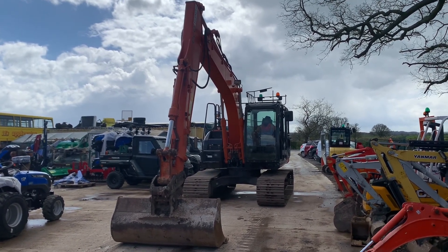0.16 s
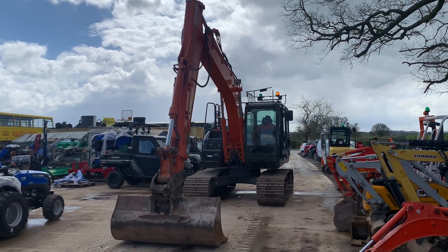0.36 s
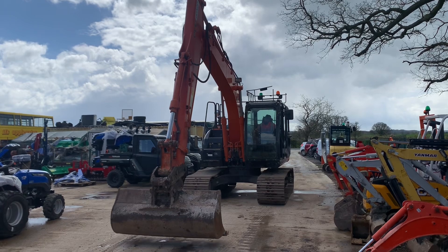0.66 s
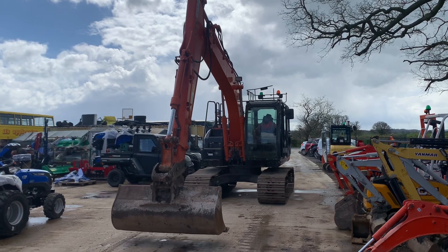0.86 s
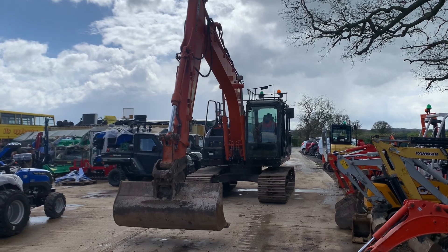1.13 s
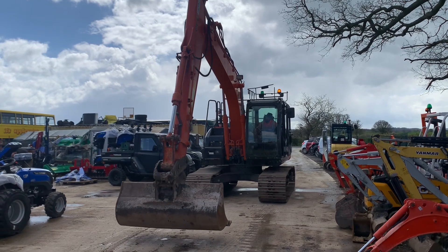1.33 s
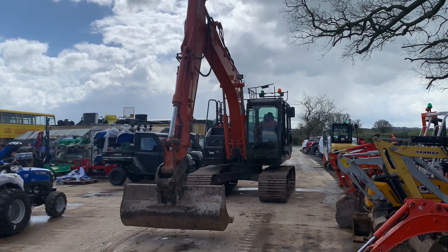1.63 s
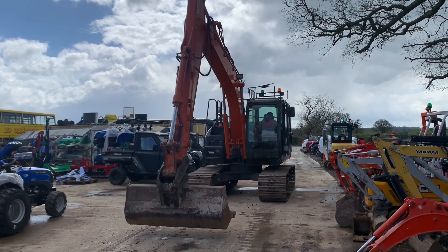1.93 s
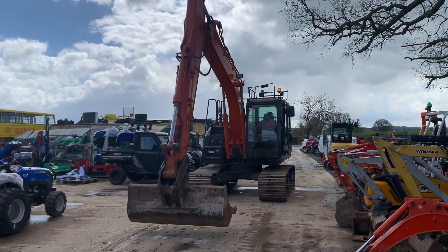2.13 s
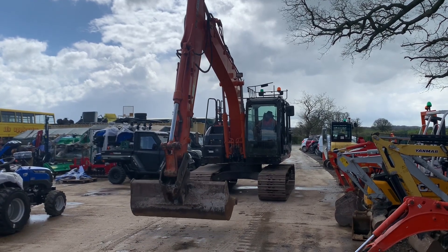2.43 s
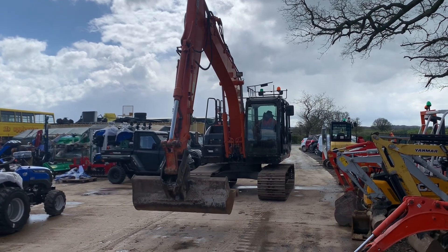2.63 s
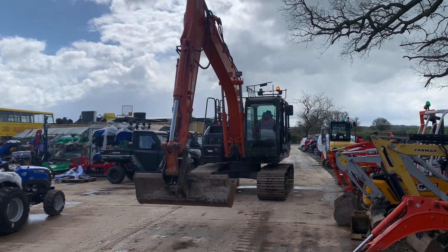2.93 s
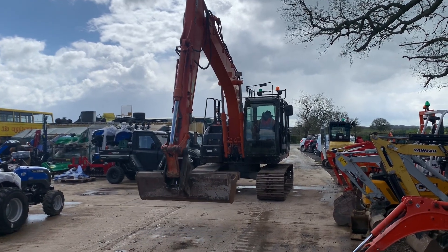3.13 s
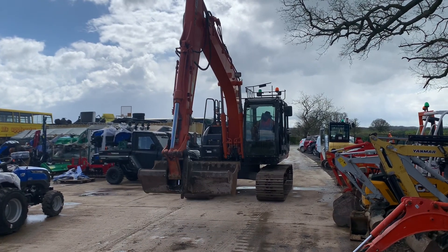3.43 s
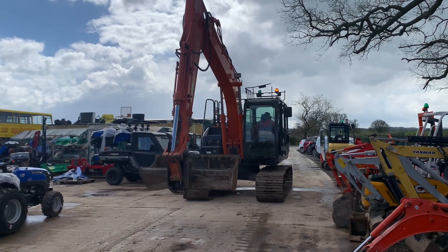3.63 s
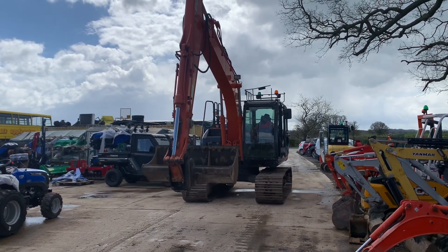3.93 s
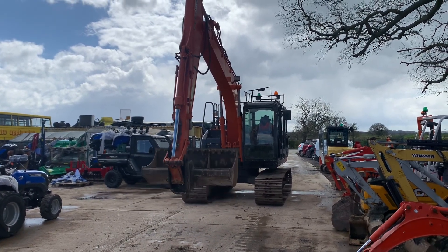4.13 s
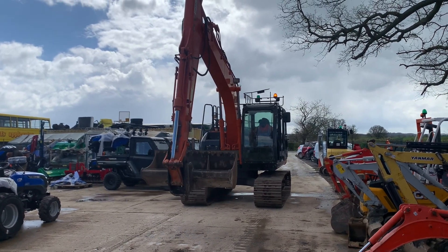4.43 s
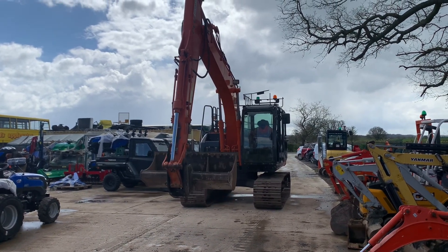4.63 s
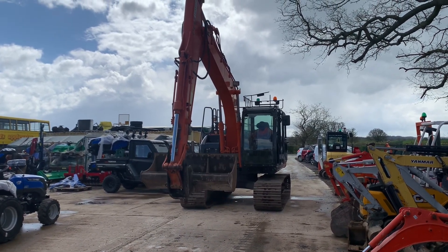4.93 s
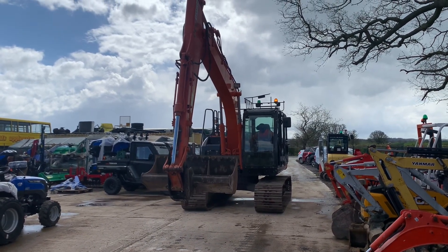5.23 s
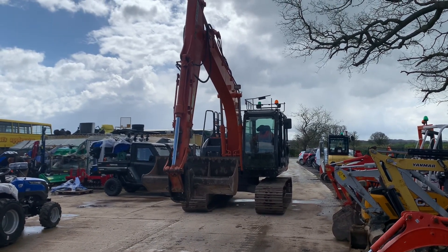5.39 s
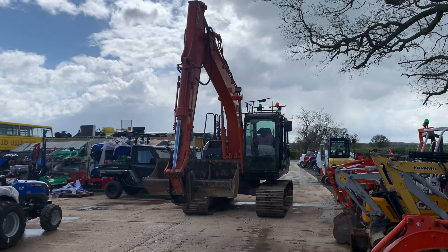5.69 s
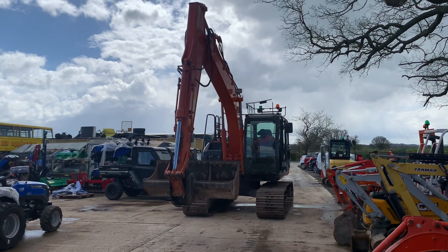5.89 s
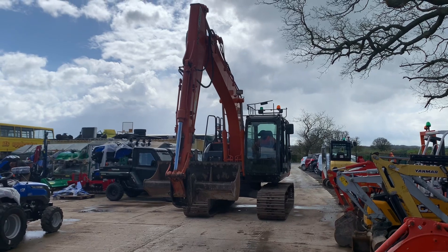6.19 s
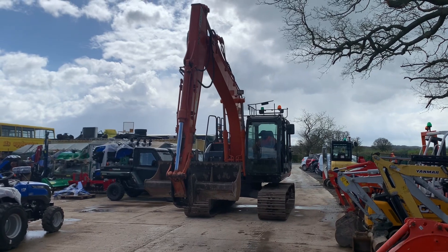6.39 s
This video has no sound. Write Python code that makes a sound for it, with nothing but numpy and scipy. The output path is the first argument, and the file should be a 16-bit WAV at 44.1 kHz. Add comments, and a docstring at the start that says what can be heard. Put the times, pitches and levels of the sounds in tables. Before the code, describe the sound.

Tracked excavator engine droning steadily in an open yard, with hydraulic whine, thin pin squeaks, heavy steel knocks, and wind buffeting the microphone.

```python
"""A gust bursts against the microphone over the hum of a tracked excavator idling in an open yard.
Engine: harmonics of the firing rate and coloured noise that pulses with it. Pump: narrow-band whistles.
Moving arm and bucket: valve hiss from noise, pin squeaks from gliding resonances, clunks from decaying
noise and ringing modes. Wind: low rumble, faster flutter and damped thumps of single eddies."""
import sys
import numpy as np
from scipy import signal
from scipy.fft import rfft, irfft, next_fast_len
from scipy.io import wavfile
from scipy.ndimage import uniform_filter1d

SR = 44100
rng = np.random.default_rng(int(sys.argv[2]) if len(sys.argv) > 2 else 0)


def log_audio(samples):
    """Write samples as a 16-bit WAV file to the path given in sys.argv[1]."""
    # one column per channel
    frames = np.atleast_2d(samples).T
    # limit to full scale, then quantise
    limited = np.clip(frames, -1, 1)
    pcm = np.round(limited * 32767).astype(np.int16)
    wavfile.write(sys.argv[1], SR, pcm)


N = 288855  # length in samples

# engine firing rate, which steps up once: t/s, f/Hz
FIRING_RATE = [(0, 46.72), (2.55, 46.63), (2.75, 47.58), (4.5, 47.47), (6.55, 47.67)]
# hydraulics at work: t/s, pump whine level/dB, oil hiss level/dB, throbbing valve tone level/dB
HYDRAULIC_WORK = [(0, -58.5, -65, -54), (.5, -54, -64.5, -56.5), (1.1, -48.5, -64.5, -47.5),
                  (1.6, -51, -64.5, -54.5), (2.15, -50, -64.5, -55.5), (2.6, -48.5, -63.5, -51.5),
                  (3.1, -52.5, -65.5, -61.5), (3.3, -53.5, -65.5, -54), (3.75, -52.5, -67.5, -54.5),
                  (3.95, -54, -65.5, -55.5), (4.6, -53, -63.5, -57), (4.9, -55, -69, -66),
                  (5.75, -57, -71, -60.5), (5.9, -54, -70, -51), (6.06, -56, -69, -48.5),
                  (6.15, -53, -70, -58), (6.55, -53.5, -66.5, -57)]


def engine_hum():
    """Periodic firing radiates a harmonic series: a nearly pure fundamental with weak overtones."""
    # level of the hum: t/s, level/dB
    hum_level = [(0, -26), (.6, -33), (1.1, -29), (1.9, -27.5), (2.3, -31), (3.2, -26), (3.7, -30),
                 (4.2, -29), (4.4, -25), (4.65, -31), (5.05, -24), (5.3, -31), (5.7, -28.5), (6.1, -31),
                 (6.55, -30.5)]
    # overtones: multiple of the firing rate, level relative to the fundamental/dB
    overtones = [(2, -10.5), (3, -16.5)]
    (level_db,) = curves(hum_level)
    phase = 2 * np.pi * firing_cycles()
    hum = np.sin(phase)
    for multiple, overtone_db in overtones:
        hum = hum + amp(overtone_db) * np.cos(multiple * phase)
    return np.sqrt(2) * amp(level_db + 1.2 * wander(5, N)) * hum


def engine_clatter():
    """Amplitude modulation of noise: each firing starts a pulse that decays within its cycle."""
    # spectrum of engine and fan: f/Hz, relative density/dB per Hz
    clatter_colour = [(60, -37.5), (100, -1.5), (172, 0.5), (348, -18.5), (480, -20.5), (634, -21.5),
                      (760, -14.5), (969, -21), (1190, -20.5), (1740, -25.5), (2110, -28.5), (2350, -31.5),
                      (2600, -36.5), (2950, -36.5), (3300, -36.5), (4500, -55.5), (8000, -81)]
    mean_db, follows = -37, 0.48  # follows: share of the hiss's dB swing
    hiss_db = curves(HYDRAULIC_WORK)[1]
    pulse = 1 + 0.38 * np.exp(-(firing_cycles() % 1) / 0.14)
    throb = pulse * amp(1.4 * wander(77, N) + 0.5 * wander(4.7, N))
    clatter = evened(coloured(rng.standard_normal((2, N)) * throb, clatter_colour))
    return drifting(clatter, 1.7) * amp(mean_db + follows * (hiss_db - hiss_db.mean()))


def pump():
    """Narrow-band resonance: fuzzy whistles that swell by chance, and a valve tone on the engine's cycle."""
    # whine of pump and pipes: f/Hz, bandwidth/Hz, relative level/dB, level change at rest/dB
    pipe_whistles = [(472, 26, -5, 2), (515, 30, -9, 0), (622, 42, 0, -1), (678, 20, -15, 0),
                     (735, 50, -13, 3), (1278, 20, -6.5, -4), (1365, 40, -15, 4), (1510, 35, -12, 0),
                     (1590, 25, -15, 0), (1470, 100, -5, 0), (1695, 26, -10, -1), (1768, 36, -8.5, -9),
                     (1915, 35, -15, 0), (1965, 40, -16, -3), (2080, 70, -11, -2)]
    rest_span_s = (3.9, 5.5)  # the arm comes to rest over this span
    valve_hz, valve_width_hz, firings_per_throb = 848, 42, 4
    whine_db, _, valve_db = curves(HYDRAULIC_WORK)
    rest = np.interp(np.arange(N) / SR, rest_span_s, (0, 1))
    load_drift = wander(1.2, N)  # load pulls the pitch of all whistles together

    whine = np.zeros((2, N))
    for hz, width, level_db, rest_db in pipe_whistles:
        swell = amp(level_db + rest_db * rest + 2.0 * wander(2.6, N) + 2.0 * wander(13, N))
        pitch = hz * (1 + .002 * load_drift) + .25 * width * wander(3, N)
        whine += swell * whistle(N, pitch, width, .5)

    beat = np.cos(2 * np.pi * firing_cycles() / firings_per_throb)
    valve_gain = amp(valve_db + 8 * (beat - .2) + 1.5 * wander(8, N))
    valve = valve_gain * whistle(N, valve_hz + 22 * wander(8, N), valve_width_hz, 1.6)
    return whine * amp(whine_db + 1.5 * beat) + valve


def hiss():
    """Turbulent flow noise: oil forced through the valves gives broadband noise that flickers."""
    # spectrum of the oil hiss: f/Hz, relative density/dB per Hz
    hiss_colour = [(2000, -10), (3200, 7.5), (4000, 2.5), (5000, -2), (6000, -4), (7500, -9.5), (9500, -14),
                   (10600, -20), (11000, -11), (11500, -39), (14000, -37)]
    flicker = amp(0.75 * wander(40, N) + 0.74 * wander(6.3, N))
    noise = evened(coloured(rng.standard_normal((2, N)) * flicker, hiss_colour))
    return noise * amp(curves(HYDRAULIC_WORK)[1])


def squeaks():
    """Stick-slip friction in a loaded pin excites one wavering resonance; narrow ones sing more steadily."""
    # squeaks and groans: start t/s, end t/s, start f/Hz, end f/Hz, bandwidth/Hz, level/dB
    pin_squeaks = [(0.891, 1.221, 5800, 5940, 300, -73.5), (1.1, 1.7, 4170, 4190, 80, -72),
                   (1.283, 1.58, 3500, 3520, 110, -68), (1.28, 1.62, 3815, 3770, 60, -67),
                   (1.46, 2.2, 4085, 3910, 60, -63.5), (1.6, 1.83, 5060, 5000, 110, -74),
                   (1.75, 2.5, 3790, 3820, 60, -73), (1.7, 2.65, 4180, 4180, 70, -73.5),
                   (1.88, 2.4, 3490, 3460, 60, -63.5), (1.95, 2.8, 3450, 3350, 200, -66),
                   (2.3, 2.5, 3900, 4000, 200, -70), (2.03, 2.47, 7660, 7640, 60, -78),
                   (2.76, 2.95, 4050, 4200, 260, -66), (2.75, 3.2, 7700, 7700, 90, -81),
                   (2.85, 3.1, 3780, 3600, 200, -65), (2.9, 3.2, 4200, 4150, 120, -71),
                   (2.85, 3.15, 3250, 3200, 150, -69), (2.75, 3.22, 3450, 3600, 150, -65.5),
                   (3.1, 3.9, 3450, 3300, 180, -69.5), (3.56, 3.65, 3625, 3635, 32, -55.5),
                   (3.935, 3.978, 3620, 3610, 22, -59.5), (3.985, 4.05, 3600, 3610, 30, -62),
                   (4.19, 4.287, 4153, 4200, 120, -65.5), (3.97, 4.11, 1430, 1520, 160, -50),
                   (4.0, 4.08, 1200, 1280, 130, -48.5), (4.01, 4.09, 1750, 1850, 250, -54),
                   (4.19, 4.3, 1780, 1650, 220, -51), (4.18, 4.27, 1350, 1400, 160, -51)]
    out = np.zeros((2, N))
    for start_s, end_s, start_hz, end_hz, width, level_db in pin_squeaks:
        n = round((end_s - start_s) * SR)
        taper = signal.windows.tukey(n, .3 + min(end_s - start_s, .5))
        spurts = amp(level_db + 2.2 * wander(22, n)) * taper
        glide = start_hz + (end_hz - start_hz) * np.linspace(0, 1, n) ** 3  # moves mostly near its end
        pitch = glide + .25 * width * wander(12, n)
        add(out, start_s, whistle(n, pitch, width, 40 / width) * spurts)
    return out


def clunks():
    """Impact on heavy steel excites many modes at once: a dense noise burst, and a few modes that ring."""
    # bucket linkage knocks: start t/s, initial burst level/dB, t60/s, brightness/dB per octave
    knocks = [(0.934, -43.5, 0.056, -3), (3.222, -43, .08, -6), (3.256, -43, 0.06, -9),
              (3.312, -46.5, 0.038, -8), (3.752, -31, .03, 0), (3.872, -32.5, 0.044, -9.5),
              (3.883, -31, 0.19, -1), (3.899, -32, 0.14, -6), (3.925, -37, 0.07, 2),
              (4.004, -38.5, 0.56, -12), (4.1, -44, .1, -11.5), (4.155, -32, 0.26, -2),
              (4.176, -41.5, 0.16, -4.5), (4.195, -40.5, .1, -10), (4.305, -47, 0.065, -5),
              (4.46, -41.5, 0.89, -1.5), (4.618, -46, 0.095, 5), (5.071, -55, 0.19, 7),
              (5.415, -45, 0.12, 4), (5.889, -46.5, 0.13, -6.5), (6.033, -44, 0.17, -9)]
    # spectrum of a knock: f/Hz, relative density/dB per Hz
    steel_colour = [(240, -21.5), (400, -9.5), (591, 4), (724, -13), (857, 1.5), (1380, -1), (2090, -2.5),
                    (2480, -10), (3320, -14.5), (3900, -15), (5000, -32.5), (8000, -41.5), (12000, -50.5)]
    # ringing modes: f/Hz, relative level/dB, longest t60/s
    steel_modes = [(607, -11, 0.067), (1270, -10, 0.13), (1332, -13, 0.19), (2040, -18, 0.13),
                   (2800, -19, 0.055), (4200, -16.5, 0.021)]
    out, t = np.zeros((2, N)), np.arange(SR // 2) / SR
    for start_s, level_db, t60, tilt_db in knocks:
        burst = rng.standard_normal((2, len(t))) * amp(1.5 * wander(150, len(t)))  # loose parts rattle
        tilt = [(500, -2 * tilt_db), (8000, 2 * tilt_db)]
        burst = evened(coloured(coloured(burst, steel_colour), tilt))
        burst = burst * amp(-60 * t / max(t60, .01))
        for hz, mode_db, mode_t60 in steel_modes:
            detune, chance = rng.standard_normal(2)
            start_db = mode_db + 4 + 1.5 * chance + tilt_db * np.log2(hz / 2000)
            ring_gain = amp(start_db - 60 * t / min(mode_t60, t60))
            burst = burst + ring_gain * np.sin(2 * np.pi * hz * (1 + 0.011 * detune) * t)
        onset = 1 - np.exp(-t / 0.0025)
        add(out, start_s, burst * amp(level_db) * onset)
    return out


def eddies():
    """Pressure pulses of single eddies: damped oscillations, the hardest starting with a snap of noise."""
    # thumps on the microphone: start t/s, peak level/dB, f/Hz, decay length/cycles
    eddy_thumps = [(.074, -13, 294, 1.1), (0.091, -21.5, 258, 1.4), (.103, -1, 343, 3.4),
                   (.105, -11, 560, 2), (0.116, -5, 92, 1.8), (.132, -9.5, 426, 4.6), (0.193, -8, 381, 3.7),
                   (0.195, -8, 131.6, 2.2), (.197, -8, 510, 1.9), (0.221, -7, 432, 1.2),
                   (.236, -17, 584, 2), (.249, -13, 350, 0.63), (0.26, -24.5, 520, 2),
                   (.288, -12, 298, 1.4), (0.313, -15.5, 235, 1.2), (.371, -14, 350, 1.6),
                   (0.396, -13, 298, 0.46), (.42, -29.5, 550, 1.8), (0.429, -12.5, 281, 0.73),
                   (0.461, -18, 332, 1), (.573, -20, 266, 2.1), (0.66, -13.5, 199, 3.1),
                   (0.68, -10, 77, 2.5), (0.962, -25, 108, 2.9), (0.984, -21, 350, 0.83),
                   (1.017, -25, 109, 3), (1.17, -21, 208, 1.56), (1.274, -13.5, 173, 0.94),
                   (1.408, -11.5, 148, 0.41), (1.697, -18.5, 98, 1.1), (1.85, -13.5, 102, 0.93),
                   (2.227, -12.5, 126, 0.56), (2.276, -16.5, 204, 0.94), (2.351, -25, 470, 0.65),
                   (2.387, -22, 87, 1.2), (2.433, -19, 98, 3.2), (3.082, -19.5, 112, 1.5),
                   (3.258, -24, 413, 1.1), (3.339, -13, 75.1, 12), (3.383, -30, 219, 2),
                   (3.411, -16, 105, 3.6), (3.872, -21, 295, 1.8), (4.011, -23, 248, 7.7),
                   (4.139, -18.5, 237, 1.8), (4.25, -17.5, 259, 2.4), (4.274, -18, 322, 5.2),
                   (4.342, -14.5, 121, 0.41), (4.443, -12.5, 152, 0.94), (4.459, -13.5, 238, 1.8),
                   (4.528, -21, 212, 5.8), (4.946, -18, 202, 1.3), (4.993, -13, 83, 2.4),
                   (5.024, -12, 75, 2.1), (5.123, -21, 202, 0.99), (5.605, -16.5, 190, 2.7),
                   (5.615, -27, 476, 2.5), (5.651, -15, 252, 2.3), (5.67, -11.5, 61.7, 0.92),
                   (5.814, -13, 75, 3.3), (5.82, -26.5, 350, 1.1), (5.953, -22.5, 248, 1.4),
                   (6.326, -18.5, 112, 1.5)]
    # spectrum of the snap: f/Hz, relative level/dB
    snap_colour = [(600, -11.5), (1200, -4), (2200, 6), (3000, -6), (4000, -16)]
    snap_s, snap_db, snap_grows = .003, -24, 2.5  # peak time, gain for a 0 dB thump, dB per dB
    thumps, snap_gain, t = np.zeros(N), np.zeros(N), np.arange(SR // 40) / SR
    for start_s, peak_db, hz, cycles in eddy_thumps:
        u = np.arange(round(3 * cycles / hz * SR)) * hz / SR  # time in cycles
        onset = 1 - np.exp(-(u / 0.39) ** 2)
        thump = np.sin(2 * np.pi * u) * np.exp(-2.5 * u / cycles) * onset
        add(thumps, start_s, amp(peak_db) * thump / abs(thump).max())
        snap = t / snap_s * np.exp(1 - t / snap_s)
        add(snap_gain, start_s, amp(snap_db + snap_grows * peak_db) * snap)
    return thumps + snap_gain * evened(coloured(rng.standard_normal(N), snap_colour))


def wind():
    """Turbulent pressure on the microphone: lumpy low rumble, flutter in strong gusts, and eddy thumps."""
    # gusts: t/s, rumble level/dB, flutter level/dB
    gusts = [(0, -36, -33), (.07, -29.5, -29), (.097, -24, -28), (.107, -15, -15), (.12, -14, -27),
             (.137, -17, -20), (.16, -25, -32), (.185, -23, -24), (.225, -23, -17.5), (.27, -24, -19.5),
             (.33, -25, -24), (.4, -23, -22), (.46, -25.5, -25), (.54, -29, -35), (.67, -22, -25.5),
             (.75, -27, -38.5), (1, -26, -33.5), (1.3, -29, -43), (1.85, -27.5, -42.5), (2.05, -30.5, -50),
             (2.3, -27.5, -41.5), (2.65, -35, -43.5), (3.25, -31, -44), (3.37, -21, -45), (3.52, -31, -50),
             (3.76, -33.5, -55), (3.89, -25, -33), (4.05, -32, -35), (4.27, -24, -33), (4.6, -29, -38.5),
             (4.88, -28.5, -45), (5.03, -26.5, -39.5), (5.2, -30, -48.5), (5.56, -31.5, -45),
             (5.65, -24.5, -32), (5.72, -26, -44), (5.95, -27.5, -42), (6.55, -29.5, -46)]
    # spectra of rumble and flutter: f/Hz, relative density/dB per Hz
    rumble_colour = [(20, -21), (35, -6), (45, -1), (62, 7), (90, 0.5), (130, 0), (200, -7.5), (300, -20.5),
                     (500, -65.5)]
    flutter_colour = [(71, -54.5), (120, 3.5), (357, 0), (387, -2.5), (474, -7.5), (521, -7.5), (812, -26),
                      (1800, -44), (3000, -78.5), (3900, -78.5), (6600, -120)]
    # spectrum of the rasp that brightens strong flutter: f/Hz, gain/dB
    rasp_colour = [(350, -10), (700, 12), (1600, 14)]
    # share of wind noise that differs between the two ports: f/Hz, gain/dB
    port_difference = [(400, -24), (800, -2), (1300, 9.5), (3000, -0.5)]
    # wind noise dies out in the treble: f/Hz, gain/dB
    treble_loss = [(1500, -1), (3200, -24.5), (6000, -56.5)]
    rasp_grows = .4  # dB per dB of flutter level
    stir_rumble, stir_flutter = 0.17, 0.26  # gains by which each eddy stirs the noise around it
    rumble_db, flutter_db = curves(gusts)
    swirl = wander(3.3, N)  # shared by rumble and flutter

    lumps = amp(1.8 * wander(17, N) + 1.2 * swirl)
    rumble = evened(coloured(rng.standard_normal(N) * lumps, rumble_colour))
    pops = amp(3.0 * wander(170, N) + 1.5 * wander(30, N) + 0.9 * swirl)
    flutter = evened(coloured(rng.standard_normal((2, N)) * pops, flutter_colour))

    thumps = eddies()
    quick = coloured(thumps, [(130, -19.0), (300, 1.5)])  # mainly quick eddies stir the flutter
    rumble = rumble * (amp(rumble_db) + stir_rumble * envelope(thumps))
    shared, apart = flutter * (amp(flutter_db) + stir_flutter * envelope(quick))
    shared = shared + coloured(shared, rasp_colour) * amp(rasp_grows * flutter_db)
    apart = coloured(apart + 0.31 * thumps, port_difference)
    return coloured(rumble + shared + thumps + np.array([apart, -apart]), treble_loss)


def ports(a, b):
    """Partial coherence: two unrelated versions of a far sound become left and right, shifted in phase."""
    # coherence: f/Hz, left-right likeness from 0 to 1
    likeness = [(300, 0.88), (600, 0.56), (900, 0.46), (1500, 0.52), (2500, 0.78), (5000, 0.55),
                (7500, 0.6), (9000, 0.9), (13000, 0.97)]
    # phase: f/Hz, lead of the left/rad
    left_lead = [(340, 1), (600, -1), (860, -4.5), (1120, -2.5), (1380, -5), (1890, -6), (2580, -6),
                 (3010, -4.5), (5000, -5.5), (8000, -5)]
    # balance: f/Hz, left over right/dB
    left_lean = [(500, 3.5), (800, -2), (1220, -4), (1870, -2.5), (2870, -2.5), (5000, -5.5), (8000, 0)]
    n = next_fast_len(N)
    hz = np.fft.rfftfreq(n, 1 / SR)
    same = np.clip(read(likeness, hz), 0, 1)
    lean = amp(read(left_lean, hz) / 2)
    left = rfft(a, n)
    alike = same * left * np.exp(-1j * read(left_lead, hz))
    right = alike + np.sqrt(1 - same ** 2) * rfft(b, n)
    return irfft(np.array([left * lean, right / lean]), n)[:, :N]


def firing_cycles():
    """Phase is the integral of frequency: the running count of firings."""
    return np.cumsum(curves(FIRING_RATE)[0]) / SR


def whistle(n, hz, width, steady=0):
    """Heterodyning: two versions of slow complex noise plus a steady part, shifted up to the curve hz."""
    a, b = rng.standard_normal((2, 2, n // 8 + 2))  # made at an eighth of the sample rate
    pole = np.exp(-np.pi * 1.5 * width * 8 / SR)
    slow = signal.lfilter([1], np.convolve([1, -pole], [1, -pole]), a + 1j * b)
    slow = slow / slow.std() + steady
    parts = np.repeat(slow, 8, axis=1).view(float).reshape(2, -1, 2)  # real and imaginary
    fine = uniform_filter1d(parts, size=16, axis=1)
    phase = 2 * np.pi * np.cumsum(hz * np.ones(n)) / SR
    return evened(fine[:, :n, 0] * np.cos(phase) + fine[:, :n, 1] * np.sin(phase))


def envelope(x):
    """Short-time rms over the span that an eddy stirs, trailing it a little."""
    stir_s = 0.018  # half the window; the envelope lags by half of this
    window = np.hanning(round(2 * stir_s * SR)) / (stir_s * SR)
    power = signal.oaconvolve(x ** 2, window)[round(stir_s * SR / 2):][:N]
    return np.sqrt(abs(power))


def drifting(x, depth_db):
    """Time-varying filtering: broad patches of the spectrum swell and sink slowly."""
    z = signal.stft(x, nperseg=1024)[2]
    patches = rng.standard_normal(z.shape[1:])
    for _ in range(2):
        patches = uniform_filter1d(patches, size=6, axis=0)  # across frequency
        patches = uniform_filter1d(patches, size=24, axis=1)  # across time
    return signal.istft(z * amp(depth_db * evened(patches)), nperseg=1024)[1][:, :N]


def wander(hz, shape):
    """Low-pass random fluctuation of rms 1, smoothed twice over 1/hz seconds."""
    size = max(int(SR / hz), 2)
    smooth = uniform_filter1d(rng.standard_normal(shape), size)
    return evened(uniform_filter1d(smooth, size))


def coloured(x, points):
    """Linear filtering: multiplies the spectrum by a gain curve in dB."""
    n = next_fast_len(x.shape[-1] + SR // 10)
    gain = amp(read(points, np.fft.rfftfreq(n, 1 / SR)))
    return irfft(rfft(x, n) * gain, n)[..., :x.shape[-1]]


def read(points, hz):
    """Interpolates a table along a logarithmic frequency scale."""
    f, value = np.transpose(points)
    return np.interp(np.log(hz + 1), np.log(f + 1), value)


def curves(rows):
    """Interpolates each column of a table linearly in time."""
    s, *columns = np.transpose(rows)
    return [np.interp(np.arange(N) / SR, s, column) for column in columns]


def amp(db):
    """Amplitude ratio of a level in dB."""
    return 10 ** (np.asarray(db) / 20)


def evened(x):
    """Normalises to an rms of 1."""
    return x / np.sqrt(np.mean(x ** 2) + 1e-20)


def add(mix, s, sound):
    """Superposition: adds a sound to the mix from s seconds on, cut at the end."""
    part = mix[..., round(s * SR):][..., :sound.shape[-1]]
    part += sound[..., :part.shape[-1]]


def scene():
    """Superposition of the central hum, the partly coherent machine sounds and the wind."""
    machine = engine_clatter() + pump() + hiss() + squeaks() + clunks()
    return engine_hum() + ports(*machine) + wind()


def record(dry):
    """Soft saturation of the loudest gusts; bass folded to mono; then the band limit."""
    mono_hz, edge_hz = 495, 14500  # the two ports agree below mono_hz
    left, right = .92 * np.tanh(dry / .92)
    high = signal.butter(6, mono_hz, "high", fs=SR, output="sos")
    side = signal.sosfiltfilt(high, (left - right) / 2)
    both = (left + right) / 2 + np.array([side, -side])
    band = signal.ellip(8, .05, 50, edge_hz, fs=SR, output="sos")
    return signal.sosfiltfilt(band, both)


dry = scene()
out = record(dry)
log_audio(out)
```